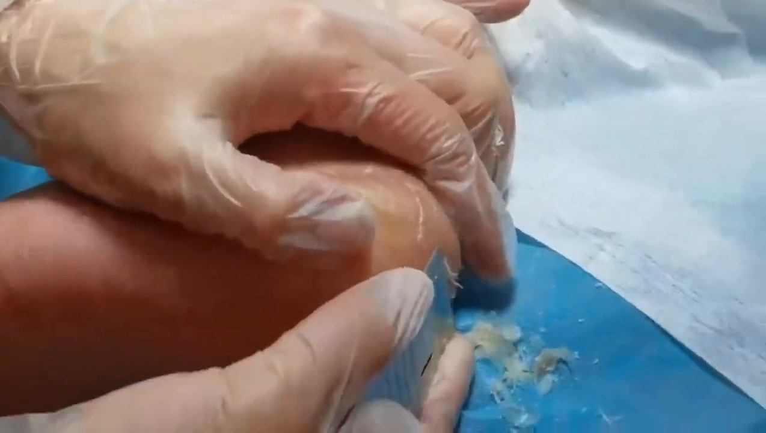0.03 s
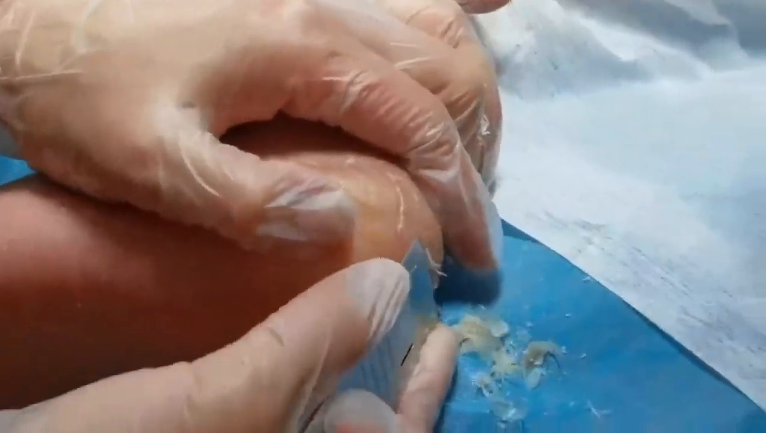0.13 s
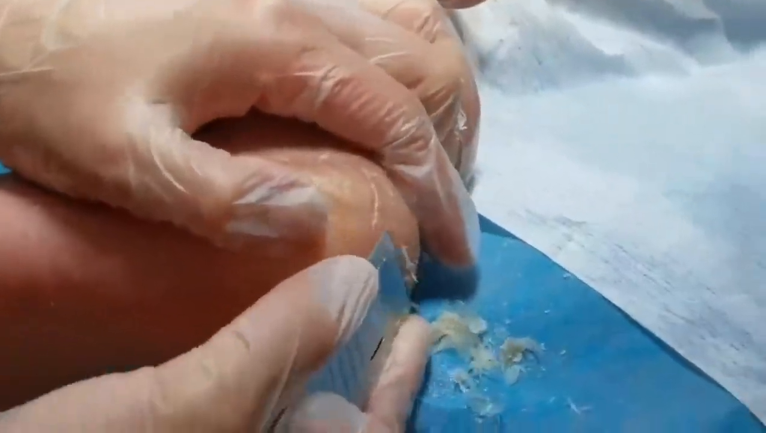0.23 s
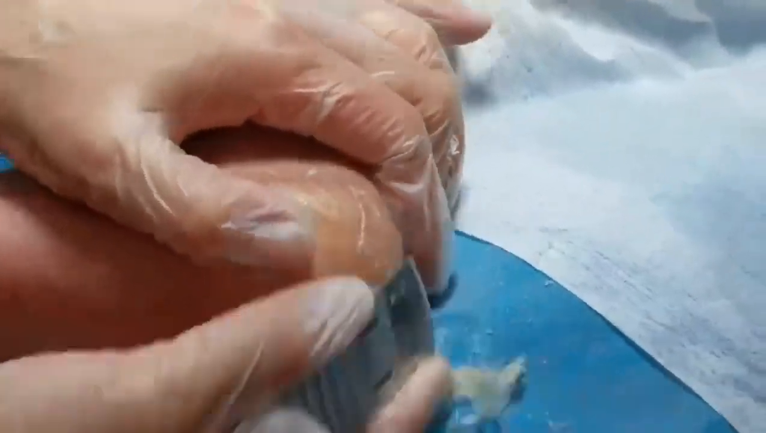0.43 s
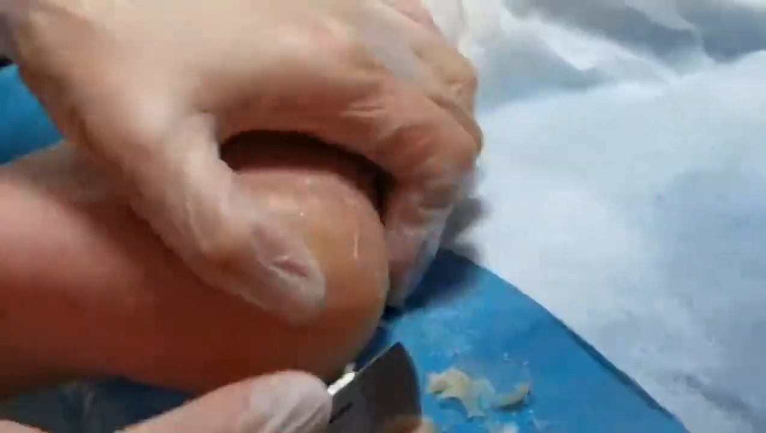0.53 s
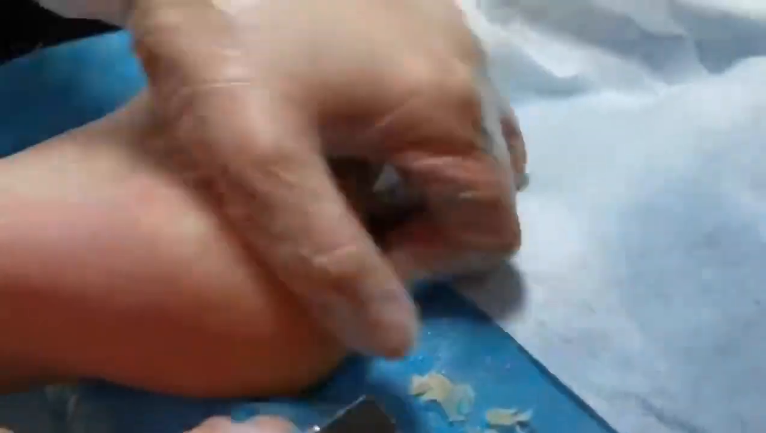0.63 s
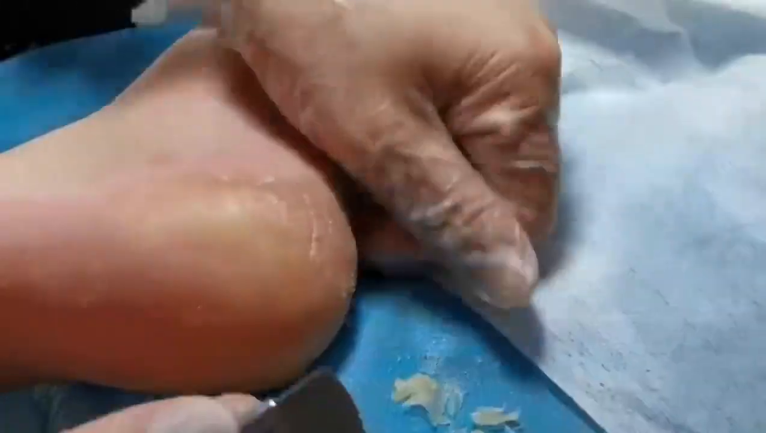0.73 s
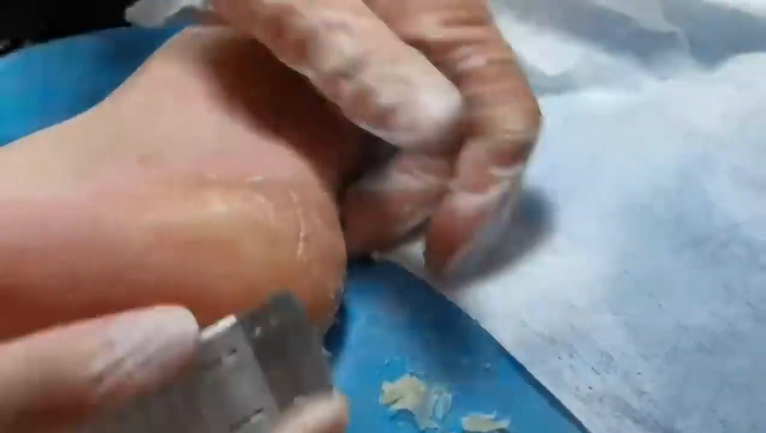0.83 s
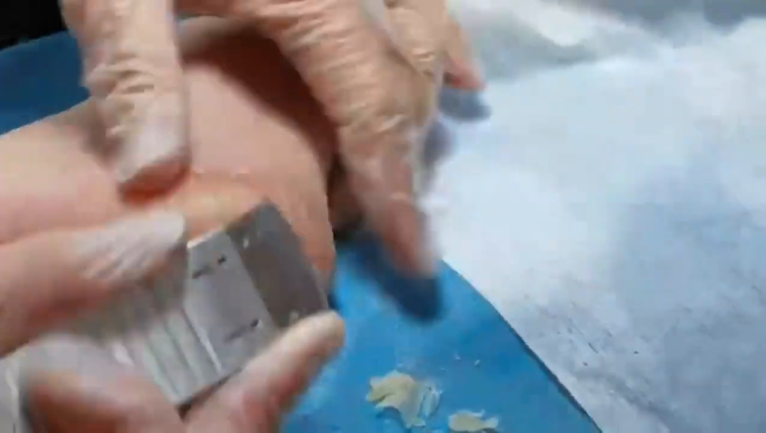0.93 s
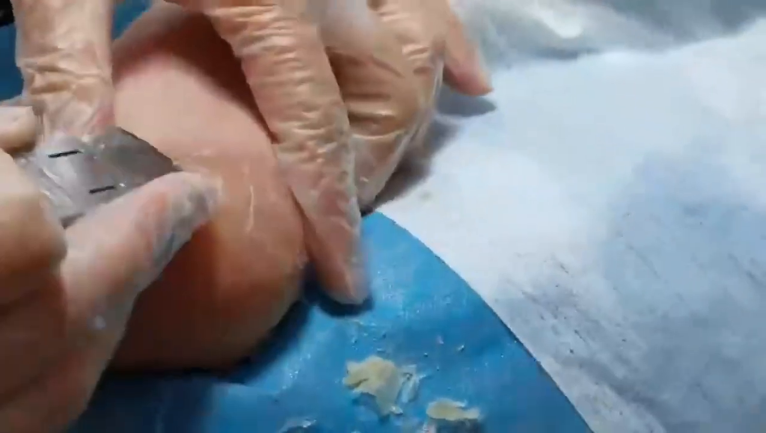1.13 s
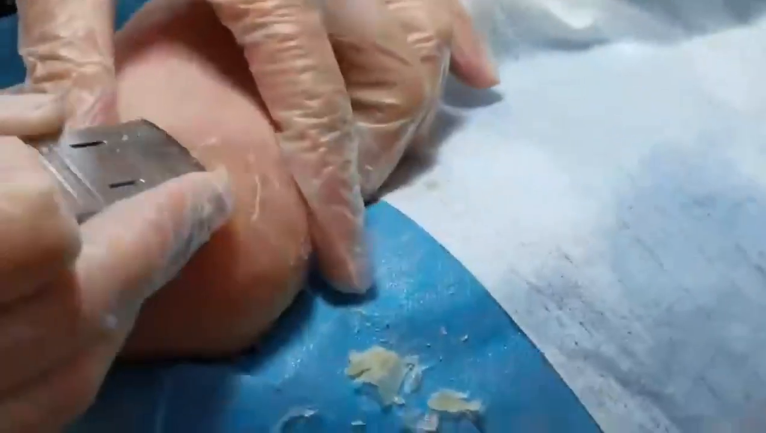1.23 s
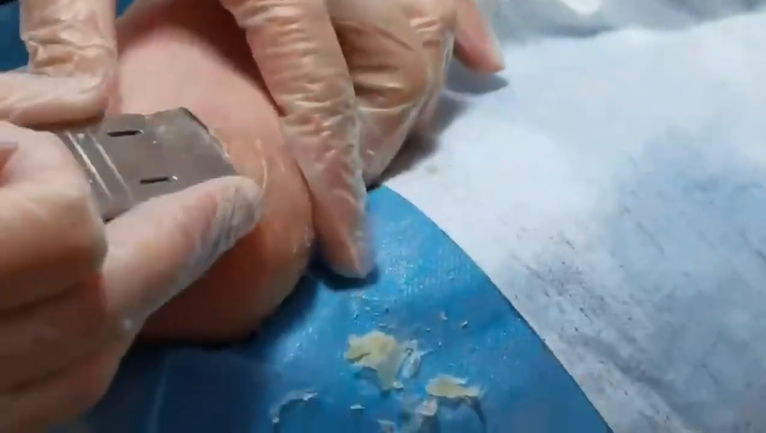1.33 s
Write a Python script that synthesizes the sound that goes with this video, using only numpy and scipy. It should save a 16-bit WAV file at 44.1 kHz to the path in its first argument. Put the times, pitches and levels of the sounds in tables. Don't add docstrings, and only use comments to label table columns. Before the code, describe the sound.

Close phone pickup of gloved hands handling a foot in a small quiet room: light rustle, a hard plasticky snap, busy crinkling and airy rubbing, a dull bump and drag, then only low hum and hiss.

```python
import sys
import numpy as np
from scipy import signal
from scipy.fft import rfft, irfft, next_fast_len
from scipy.io import wavfile
from scipy.ndimage import uniform_filter1d, map_coordinates

SR = 44100
rng = np.random.default_rng(int(sys.argv[2]) if len(sys.argv) > 2 else 0)


def file_out(sig):
    cols = np.atleast_2d(sig).T
    lim = np.clip(cols, -1, 1)
    pcm = np.round(lim * 32767).astype(np.int16)
    wavfile.write(sys.argv[1], SR, pcm)


def field_ratio(decibels):
    return 10 ** (np.asarray(decibels, dtype=float) / 20)


N = 61739


def unit(x):
    return x / np.sqrt(np.mean(x ** 2) + 1e-20)


def wobble(rate):
    knot_at = np.arange(N) * np.clip(rate, .1, 120) / SR
    return map_coordinates(rng.standard_normal(200), [knot_at])


def coloured(x, points):
    m = next_fast_len(N + 8192)
    hz, level_db = np.transpose(points)
    bin_hz = np.fft.rfftfreq(m, 1 / SR)
    curve_db = np.interp(np.log(bin_hz + 1), np.log(hz + 1), level_db)
    return unit(irfft(rfft(x, m) * field_ratio(curve_db), m)[:N])


def gestures(rows):
    t = np.arange(N) / SR
    power = np.zeros(N)
    for start, rise, hold, fall, level_db in rows:
        before = np.maximum(start - t, 0) / abs(rise)
        after = np.maximum(t - start - abs(hold), 0) / abs(fall)
        power += field_ratio(level_db - 20 * (before + after) ** 1.4) ** 2
    return np.sqrt(power)


def friction(points, per_s, spread_db, share, patchy_db, flutter_db):
    chance, size = rng.random((2, N))
    hit = np.tanh(np.maximum(per_s / SR - chance, 0) * 8 * SR / per_s)
    size_db = spread_db * np.minimum(-np.log(size), 2.9)
    slips = hit * field_ratio(size_db) * rng.standard_normal(N)
    z = signal.stft(share * unit(slips) + rng.standard_normal(N), nperseg=256)[2]
    field = uniform_filter1d(rng.standard_normal(z.shape), size=3, axis=0)
    field = uniform_filter1d(field, size=8, axis=1)
    x = signal.istft(z * field_ratio(patchy_db * unit(field)), nperseg=256)[1][:N]
    return coloured(x * field_ratio(flutter_db * wobble(89.87)), points)


def ring(s, db, hz, t60, attack):
    t = np.maximum(np.arange(N) / SR - s, 0)
    envelope = field_ratio(-60 * t / t60) * (1 - np.exp(-(t / attack) ** 2))
    shape = envelope * np.sin(2 * np.pi * hz * t)
    return field_ratio(db) * shape / np.abs(shape).max()


def background():
    # pitch_hz, level_db, sway_rate (knots per s), sway_db
    hum_lines = [(100, -60, 13.77, 3.34), (200, -67.5, 8.04, 3.6), (301.7, -63, 25, 2)]
    # hz, level_db (per Hz)
    air_colour = [(12, -63), (30, -14.5), (64, -12), (102, 0), (162, -19), (179, -26.5), (305, -13.5),
                  (356, -21), (1200, -43), (1560, -68), (2640, -120)]
    # hz, level_db (per Hz)
    hiss_colour = [(470, -32), (800, -11.5), (1800, -10), (3400, -13), (5700, -4), (8500, -7.5),
                   (14500, -15)]
    t = np.arange(N) / SR
    hum = np.zeros(N)
    for hz, db, rate, sway_db in hum_lines:
        level = np.sqrt(2) * field_ratio(db - 5.5 * (t - .7) + sway_db * wobble(rate))
        hum += level * np.sin(2 * np.pi * hz * t + 0.9 * wobble(rate))
    air_db = -54 - 3 * (t - .7) + 2.37 * wobble(7.83)
    air = field_ratio(air_db) * coloured(rng.standard_normal(N), air_colour)
    hiss = field_ratio(-65) * friction(hiss_colour, 500, 2.2, 0.41, 1.4, 0.46)
    return hum + air + hiss


def glove_crinkles():
    # peak_s, rise_s and fall_s (for 20 dB, sign ignored), level_db
    crinkles = [(0.043, 0.2, 0.03, -45.5), (0.106, -0.4, 0.08, -54.5), (0.247, .05, 0.13, -45),
                (.272, .04, 0.05, -41.5), (0.343, .04, 0.12, -38), (.367, .018, 0.02, -31.5),
                (.402, 0.0427, 0.0335, -33.5), (0.489, 0.09, 0.1062, -34), (.560, 0.0545, 0.0855, -35),
                (0.623, .055, 0.0371, -29.5), (0.706, .026, 0.0332, -29.5), (.750, 0.0437, 0.13, -47),
                (0.829, .08, 0.0815, -38), (0.926, -0.3, 0.06, -55), (.990, .05, 0.0873, -56.5),
                (1.094, 0.0643, 0.0512, -51), (1.165, -0.08, 0.0477, -60.5), (1.39, .03, -0.78, -66),
                (.462, 0.0263, 0.05, -36.5), (1.045, .04, 0.1, -62.5)]
    # hz, level_db (per Hz)
    vinyl = [(1500, -31.5), (2600, -17.5), (3500, -12.5), (4700, -6), (6500, -2), (7900, -0.5), (8800, -15),
             (14500, -20)]
    swell = gestures([(s, rise, 0, fall, db) for s, rise, fall, db in crinkles])
    return swell * friction(vinyl, 4880, 2.6, 1.12, 3.86, 0.94)


def skin_rubs():
    # start_s (of the hold), rise_s, hold_s, fall_s, level_db
    rubs = [(.035, .04, .015, .06, -71), (.262, 0.029, .03, 0.032, -55), (.345, 0.036, .02, .04, -45),
            (.400, 0.029, 0.0178, .05, -43.5), (.460, 0.035, .11, 0.054, -36.5),
            (.620, .04, .02, 0.045, -45), (.695, 0.055, 0.026, 0.047, -44), (.800, .04, 0.042, 0.0543, -44),
            (.880, 0.045, .02, 0.049, -48.5), (.985, 0.1, 0.0277, 0.088, -61),
            (1.072, .015, .04, 0.075, -53.5), (1.282, 0.0135, 0.0044, 0.013, -62)]
    # hz, level_db (per Hz)
    skin = [(2000, -43.5), (4000, -12.5), (6500, -8), (9000, -1.5), (10800, 2.5), (14500, -29.5)]
    return gestures(rubs) * friction(skin, 8300, 2.8, 0.98, 1.4, 1.56)


def paper_crumples():
    # start_s (of the hold), rise_s, hold_s, fall_s, level_db
    crumples = [(.030, 0.048, 0.0273, 0.0268, -53.5), (.105, 0.035, 0.017, 0.026, -61.5),
                (.262, 0.056, 0.021, 0.03, -50.5), (.338, 0.012, 0.081, .06, -42.5),
                (.460, 0.0516, 0.0502, 0.059, -37), (.540, .04, .025, 0.0476, -39.5),
                (.640, 0.021, 0.011, 0.038, -40.5), (.695, 0.018, 0.014, 0.075, -47),
                (.800, 0.031, 0.04, 0.058, -43.5), (.890, .05, 0.063, .1, -61.5),
                (1.075, 0.111, 0.038, 0.091, -62)]
    # hz, level_db (per Hz)
    paper = [(700, -24.5), (1500, -11.5), (2100, 0.5), (3000, -4.5), (4200, -4.5), (5500, -8.5),
             (8000, -12), (14500, -35)]
    return gestures(crumples) * friction(paper, 3140, 1.5, 0.84, 2.23, 1.94)


def fold_snaps():
    # start_s, peak_db, pitch_hz
    snaps = [(.2283, -33, 7600), (.2452, -33, 7500), (.2640, -26, 7400), (.3633, -7, 7000),
             (.3648, -19, 6000), (.3660, -23, 7600), (.3742, -25, 6500), (.3750, -25, 7200),
             (.6200, -20, 7000), (.6292, -24, 6900), (.7068, -23, 7600), (.9862, -43, 7800),
             (1.280, -50, 9000)]
    out = np.zeros(N)
    for s, db, hz in snaps:
        out += ring(s, db, hz, 7.5 / hz, .0008)
        out += ring(s, db - 11.5, 0.57 * hz, 0.0025, 0.00084)
        out += ring(s, db - 20.5, 1342, 0.00267, 0.0004)
        out += ring(s, db - 23, 12300, 0.006, 0.0004)
    return out


def couch_bumps():
    # start_s, peak_db, pitch_hz, t60_s
    bumps = [(0.2432, -26.5, 317, 0.015), (0.2565, -33, 240, 0.092), (.272, -43.5, 195, 0.066),
             (.250, -42.5, 557, 0.036), (.799, -34, 245, 0.044), (.814, -38.5, 1105, .03),
             (0.955, -33.5, 107, 0.026), (0.968, -38.5, 132, 0.03), (1.013, -46, 84, .045),
             (0.8, -50, 657.4, 0.0122), (0.981, -40, 97, 0.033), (0.856, -40.5, 111.3, 0.083),
             (0.9444, -48, 1367, 0.0086), (1.154, -39, 97, 0.12), (1.186, -46, 110, .07),
             (1.112, -46, 100, .06), (1.207, -42, 98.5, 0.091), (1.348, -42, 105, 0.1)]
    return sum(ring(s, db, hz, t60, 0.73 / hz) for s, db, hz, t60 in bumps)


def foot_drags():
    # start_s (of the hold), rise_s, hold_s, fall_s, level_db
    drags = [
        (.255, 0.0297, 0.034, 0.033, -56),
        (.340, .015, 0.0087, .03, -54),
        (.405, 0.019, 0.0111, 0.035, -55),
        (.460, 0.0368, .05, 0.118, -42.5),
        (.635, 0.0237, 0.018, 0.047, -52.5),
        (.700, 0.035, 0.009, .05, -57.5),
        (.802, 0.043, 0.0247, 0.063, -44.5),
        (.950, .02, .015, 0.043, -59.5),
        (.885, 0.0275, .02, .03, -58.5),
    ]
    # hz, level_db (per Hz)
    pad = [(90, -33), (160, 1), (330, 2), (800, -1.5), (1500, -2), (2500, -57.5), (5000, -56)]
    return gestures(drags) * friction(pad, 1550, 1.9, 0.578, 3.1, 1.77)


def cushion():
    # start_s (of the hold), rise_s, hold_s, fall_s, level_db
    shifts = [
        (.290, 0.12, 0.045, 0.083, -52.5),
        (.600, 0.053, 0.127, 0.113, -51.5),
        (.870, 0.099, 0.095, 0.132, -60.5),
    ]
    # hz, level_db (per Hz)
    padding = [(60, -12), (130, -6.5), (240, 0), (380, -3.5), (700, -27)]
    return gestures(shifts) * field_ratio(2.0 * wobble(29.93)) * coloured(rng.standard_normal(N), padding)


def room(x):
    t = np.arange(SR // 4) / SR
    t60_s = 0.11
    tail = rng.standard_normal(len(t)) * field_ratio(-60 * t / t60_s) * (t > .001)
    return signal.fftconvolve(x, tail / np.linalg.norm(tail))[:N]


def scene():
    floor = background()
    near = glove_crinkles() + skin_rubs() + paper_crumples() + fold_snaps() + couch_bumps() + foot_drags()
    start_s = 0.037
    near = near * np.minimum(0.34 + np.arange(N) / SR / start_s, 1)
    return (near + field_ratio(-10) * room(near) + floor + cushion())[None]


def mic_and_dropouts(x):
    # hz, level_db
    mic = [(9000, -0.5), (11200, -1.5), (11600, -7.5), (13600, 0), (13850, -30), (14300, -36), (15000, -52)]
    # start_s, end_s, pitch_hz, width_hz
    dropouts = [(.09, .14, 3000, 160), (.21, .24, 3150, 180), (.385, .43, 3000, 170),
                (.44, .475, 4500, 200), (.62, .665, 3250, 170), (.62, .66, 2600, 130),
                (.705, .785, 3080, 190), (.745, .775, 3850, 200), (.77, .82, 2750, 170),
                (.87, .95, 3270, 190), (.985, 1.03, 3080, 190), (1.085, 1.15, 2600, 170),
                (1.11, 1.22, 3850, 220), (1.24, 1.3, 2800, 200)]
    hz, t, z = signal.stft(x, SR, nperseg=2048)

    band_db = 10 * np.log10(uniform_filter1d(np.abs(z) ** 2, size=32, axis=0) + 1e-20)
    gate_db, scatter_db = -94, 6
    scatter = rng.standard_normal((33, z.shape[1])).repeat(32, axis=0)[:len(hz)]
    top = 1 / (1 + field_ratio(10 * (gate_db - band_db + scatter_db * scatter)))

    field = uniform_filter1d(rng.standard_normal(z.shape), size=8, axis=0)
    field = unit(uniform_filter1d(field, size=3, axis=1))
    rarity, hole_db = 1.15, -34
    middle = (hz > 1710) & (hz < 4820)
    holes = 1 / (1 + np.exp(-8 * (field - rarity))) * middle[:, None]
    for start, end, mid_hz, width_hz in dropouts:
        hole = np.outer(np.abs(hz - mid_hz) < width_hz / 2, (t > start) & (t < end))
        holes = np.maximum(holes, hole)

    mic_hz, mic_db = np.transpose(mic)
    gain = field_ratio(np.interp(hz, mic_hz, mic_db))[:, None]
    gain = gain * np.where(hz[:, None] > 11600, top, 1) * field_ratio(hole_db * holes)
    return signal.istft(z * gain, SR, nperseg=2048)[1][:N]


def top_cut(x):
    return signal.sosfilt(signal.butter(12, 15110, fs=SR, output="sos"), x)


def record(dry):
    mix = mic_and_dropouts(dry[0])[None]
    return top_cut(mix)


dry = scene()
out = record(dry)
file_out(out)
```